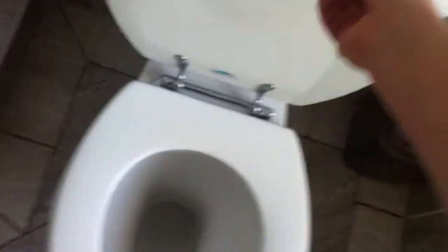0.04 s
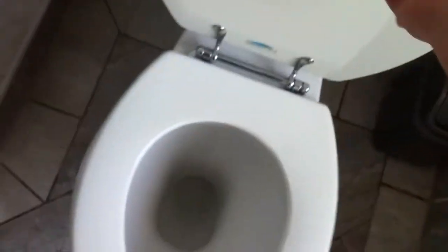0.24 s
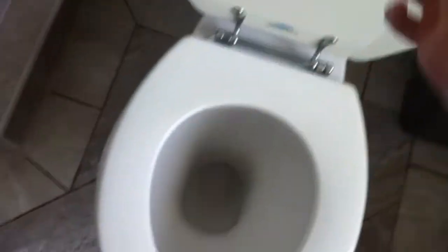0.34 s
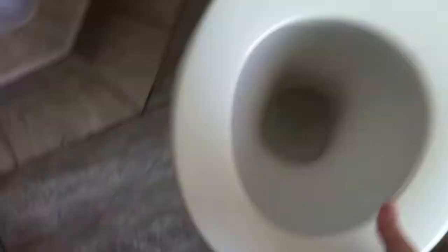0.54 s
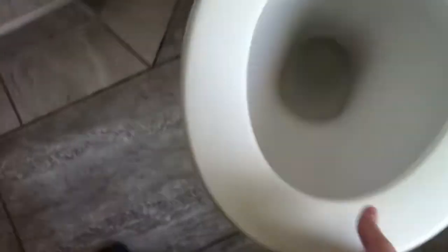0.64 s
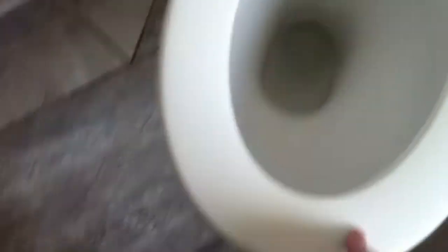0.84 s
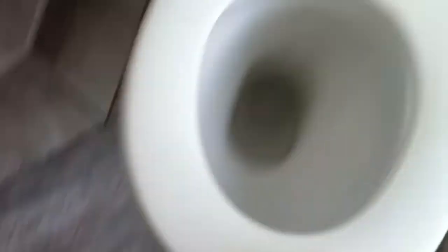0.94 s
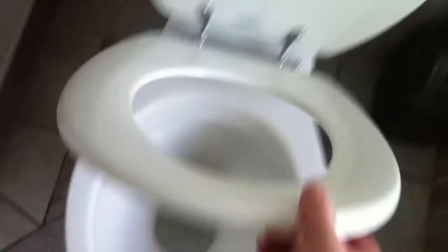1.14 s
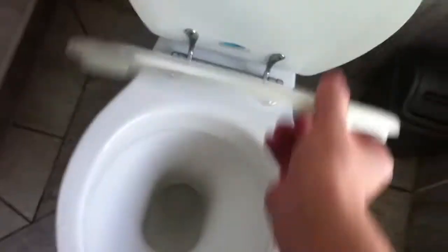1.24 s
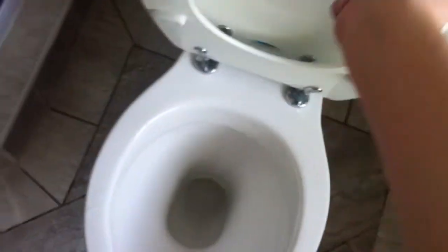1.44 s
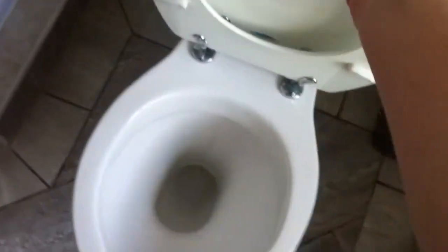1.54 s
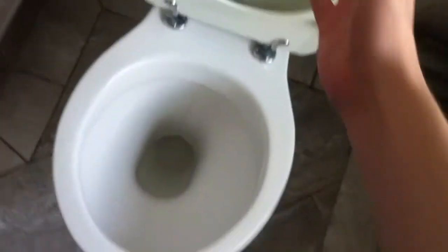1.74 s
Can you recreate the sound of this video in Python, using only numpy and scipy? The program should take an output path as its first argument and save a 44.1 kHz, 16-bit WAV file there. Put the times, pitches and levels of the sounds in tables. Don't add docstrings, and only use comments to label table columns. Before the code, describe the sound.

A loud toilet lid knock at the start rings through a tiled bathroom, then faint seat handling

```python
import sys
import numpy as np
from scipy import signal
from scipy.fft import rfft, irfft, next_fast_len
from scipy.io import wavfile
from scipy.ndimage import map_coordinates

SR = 44100
rng = np.random.default_rng(int(sys.argv[2]) if len(sys.argv) > 2 else 0)


def ratio(d):
    e = np.asarray(d, float) / 20
    return 10 ** e


def file_out(sig):
    cols = np.atleast_2d(sig).T
    lim = np.clip(cols, -1, 1)
    pcm = np.round(lim * 32767).astype(np.int16)
    wavfile.write(sys.argv[1], SR, pcm)


N = 79380
BLOW_S = 0.2074


def unit(x):
    return x / np.sqrt(np.mean(x ** 2) + 1e-20)


def along(points, hz):
    f, v = np.transpose(points)
    return np.interp(np.log(hz + 1), np.log(f + 1), v)


def curve(rows):
    return np.interp(np.arange(N) / SR, *np.transpose(rows))


def noise(response, size=N):
    m = next_fast_len(size + 8192)
    spectrum = rfft(rng.standard_normal(m)) * response(np.fft.rfftfreq(m, 1 / SR))
    return unit(irfft(spectrum, m)[:size])


def spectral_noise(points, size=N):
    return noise(lambda f: ratio(along(points, f)), size)


def peak(f, hz, width_hz):
    return 1j * f * width_hz / (hz * hz - f * f + 1j * f * width_hz)


def wobble(rate):
    return map_coordinates(rng.standard_normal(200), [np.arange(N) * rate / SR])


def add(track, s, x):
    part = track[round(s * SR):][:len(x)]
    part += x[:len(part)]


def ring(pitches, decays, t, attack_s, turn):
    total = 0
    for hz, (db, t60) in zip(pitches, decays):
        phase = 2 * np.pi * (hz * t + turn * rng.random())
        total = total + ratio(db - 60 * t / t60) * np.sin(phase)
    return (1 - np.exp(-t / attack_s)) * total


LID_HZ = [228, 380, 798, 838, 894, 970, 1115, 1256, 1356, 1675, 1808, 1940, 2495, 3200]
# level in dB, T60 in seconds.
LID = [(-14, 0.26), (-9, .07), (-14.5, 0.073), (-7.5, 0.18), (-10, 0.11), (-9, 0.17), (7, 0.04),
       (-17, 0.35), (-10.5, 0.089), (-11.5, .2), (-13, 0.16), (-10, 0.15), (-11.5, 0.13), (-17, 0.015)]
# frequency in Hz, level in dB per Hz.
CRACK = [(60, -41.5), (140, -19.5), (400, -8.5), (1150, -6), (3300, -13), (3900, -31.5), (8000, -41),
         (15500, -61)]


def lid():
    blow_db, lid_rise_s = -9.5, 0.002
    crack_db, crack_t60_s = -10, 0.035
    snap_hz, snap_s, snap_db = 1900, 0.00026, -7
    lead_s, lead_db, lead_t60_s = 0.0028, -39.5, 0.046
    out, t = np.zeros(N), np.arange(SR // 2) / SR
    burst = spectral_noise(CRACK, len(t))
    rise = (1 - np.exp(-t / 0.0005)) ** 2

    u = t - 2 * snap_s
    snap = ratio(snap_db) * np.cos(2 * np.pi * snap_hz * u) * np.exp(-(u / snap_s) ** 2)
    modes = ratio(blow_db) * ring(LID_HZ, LID, t, lid_rise_s, 0.26)
    crack = rise * ratio(crack_db - 60 * t / crack_t60_s) * burst
    first_touch = rise * ratio(lead_db - 60 * t / lead_t60_s) * burst[::-1]

    add(out, BLOW_S, snap + modes + crack)
    add(out, BLOW_S - lead_s, first_touch)
    return out


# frequency in Hz, level in dB per Hz.
TAIL = [(60, -71), (115, -33), (145, -8.5), (1100, 0), (2500, -5.5), (3600, -26), (8000, -39),
        (15500, -54.5)]
# frequency in Hz, T60 in seconds.
TILES = [(130, 0.92), (300, 0.86), (700, 0.63), (1500, 0.64), (3000, 0.52), (6000, 0.51), (12000, .25)]
ROOM_HZ = [145, 165, 181, 220, 285, 320, 361, 438, 672, 837, 906, 1080, 1255, 1812]
# level in dB, T60 in seconds.
ROOM_MODES = [(-35, 0.56), (-35, 0.83), (-39, 1.4), (-47.5, 2.1), (-35.5, 0.8), (-33.5, .9), (-36.5, 0.91),
              (-32.5, 0.66), (-41.5, 1.1), (-32, 0.44), (-29.5, 0.62), (-31.5, .5), (-31.5, 0.73),
              (-29.5, 0.66)]


def bathroom():
    tail_db, tail_rise_s = -19.5, 0.0064
    out, t = np.zeros(N), np.arange(SR * 3 // 2) / SR
    hz, s, z = signal.stft(spectral_noise(TAIL, len(t)), SR, nperseg=256)
    decay = ratio(-60 * s / along(TILES, hz)[:, None])
    tail = signal.istft(z * decay, SR, nperseg=256)[1][:len(t)]
    diffuse = ratio(tail_db) * (1 - np.exp(-t / tail_rise_s)) * tail
    add(out, BLOW_S, diffuse + ring(ROOM_HZ, ROOM_MODES, t, 0.0038, 0.89))
    return out


# start in seconds, level in dB, centre in Hz,
# width in Hz, T60 in seconds.
TAPS = [(0.2116, -51, 45, 59.6, 0.35), (.7891, -68.5, 10000, 8930, 0.065),
        (0.9088, -52.5, 1870, 3550, 0.14), (0.9098, -64.5, 12100, 8100, 0.069),
        (0.9252, -52.5, 2060, 1490, 0.21), (0.93, -53.5, 264, 258, 0.53), (.9381, -54, 715, 110, .21),
        (.9421, -54.5, 887, 160, 0.27), (0.9403, -58, 1740, 131, 0.3), (0.984, -63.5, 75, 55, 0.26),
        (1.0476, -61, 870, 173, .3), (1.1649, -58, 1000, 915, 0.2), (1.3604, -66, 1290, 65, 0.59),
        (1.369, -63, 1820, 94.5, 0.32), (1.609, -51.5, 1600, 1510, 0.081), (1.6075, -63.5, 2800, 510, .041),
        (1.6242, -56, 1753, 910, .091), (1.7669, -57.5, 3290, 505, 0.037),
        (1.7672, -53.5, 1670, 2330, 0.084), (1.7851, -56.5, 1420, 2600, 0.1)]


def seat_taps():
    out, t = np.zeros(N), np.arange(SR // 3) / SR
    for s, db, hz, width_hz, t60 in TAPS:
        puff = noise(lambda f: peak(f, hz, width_hz) ** 3, len(t))
        build_up = 1 - np.exp(-t * hz / 0.5)
        add(out, s, ratio(db - 60 * t / t60) * build_up * puff)
    return out


# frequency in Hz, width in Hz, level in dB.
SEAT = [(902, 78, -5.5), (1290, 36, -3.5), (1820, 49, -10.5), (2465, 340, -8.5)]
# time in seconds, level in dB.
HINGE = [(0, -61), (.06, -65.5), (.2, -66), (.9, -64.5), (1.05, -65), (1.2, -58.5), (1.32, -63),
         (1.42, -75), (1.58, -73), (1.8, -60)]


def hinge():
    def body(f):
        total = 0.29 * peak(f, 2000, 1800) ** 2 + 0.54 * peak(f, 330, 180) ** 2
        for k, (hz, width_hz, db) in enumerate(SEAT):
            total = total + (-1) ** k * ratio(db) * peak(f, hz, width_hz)
        return total

    return ratio(curve(HINGE) + 2.0 * wobble(40)) * noise(body)


# time in seconds, level in dB.
HUM = [(.2, -84), (.6, -75.5), (.8, -74), (.9, -66.5), (.96, -57.5), (1.04, -68), (1.08, -57), (1.14, -72),
       (1.2, -57.5), (1.31, -59.5), (1.39, -69.5), (1.45, -60), (1.5, -53), (1.56, -65.5), (1.64, -68),
       (1.68, -61), (1.8, -59.5)]


def bowl():
    bowl_hz, drift_hz = 208, 2.5
    phase = 2 * np.pi * np.cumsum(bowl_hz + drift_hz * wobble(14)) / SR
    tone = np.sqrt(2) * np.sin(phase) * ratio(1.5 * wobble(30))
    return ratio(curve(HUM)) * tone


# time in seconds, level in dB.
SWISH = [(0, -61.5), (.1, -76.5), (.2, -82.5), (1.12, -83), (1.22, -63.5), (1.33, -70), (1.4, -85)]


def swish():
    return ratio(curve(SWISH)) * noise(lambda f: peak(f, 2800, 1470) ** 3)


# time in seconds, level in dB.
SLEEVE = [(1.55, -110), (1.7, -68.5), (1.74, -71), (1.78, -68), (1.8, -71)]


def sleeve():
    return ratio(curve(SLEEVE)) * noise(lambda f: peak(f, 7320, 6000) ** 2)


# frequency in Hz, level in dB per Hz.
HUSH = [(40, -31.5), (110, -14), (165, 1), (320, -4.5), (550, -11.5), (2600, -15), (4000, -22),
        (15500, -29)]


def hush():
    hush_db = -62.5
    return ratio(hush_db + 0.6 * wobble(2.7)) * spectral_noise(HUSH)


# start in seconds, depth in dB, recovery in seconds.
DUCKS = [
    (0.193, 28.5, 0.18),
    (.195, 2, 0.95),
    (.889, 5, 0.01),
]


def duck():
    attack_s = 0.002
    t, reduction_db = np.arange(N) / SR, np.zeros(N)
    for s, depth_db, recovery_s in DUCKS:
        since = np.maximum(t - s, 0)
        reduction_db += depth_db * (1 - np.exp(-since / attack_s)) * np.exp(-(since / recovery_s) ** 2)
    return ratio(-reduction_db)


def scene():
    impacts = lid() + bathroom() + seat_taps()
    quiet = hinge() + bowl() + swish() + sleeve() + hush()
    return (impacts + duck() * quiet)[None]


def top_cut(x):
    return signal.sosfilt(signal.butter(12, 15920, fs=SR, output="sos"), x)


def record(dry):
    top_hz = 15900
    high_pass = signal.butter(N=2, Wn=90, btype="high", fs=SR, output="sos")
    spectrum = rfft(signal.sosfilt(high_pass, dry))
    mix = irfft(spectrum * (np.fft.rfftfreq(N, 1 / SR) < top_hz), N)
    return top_cut(mix)


dry = scene()
out = record(dry)
file_out(out)
```